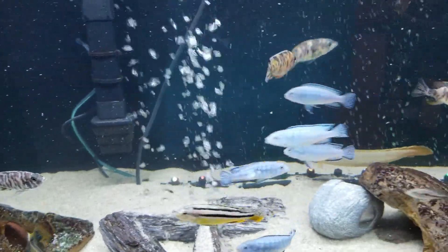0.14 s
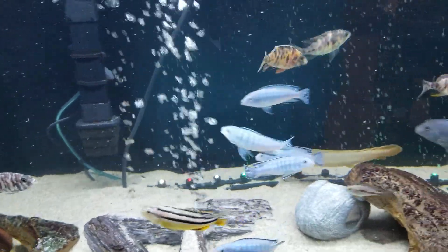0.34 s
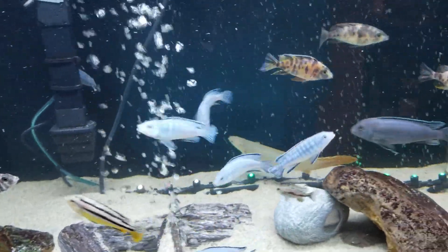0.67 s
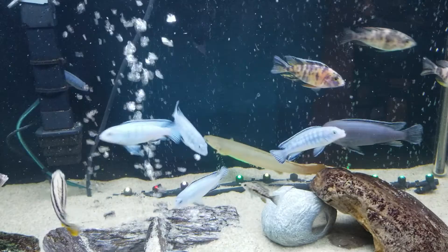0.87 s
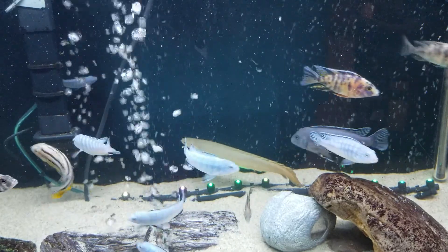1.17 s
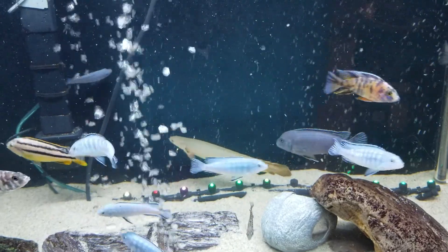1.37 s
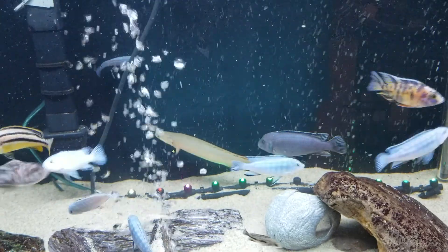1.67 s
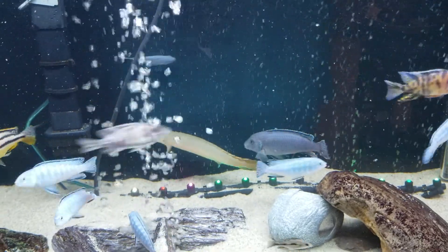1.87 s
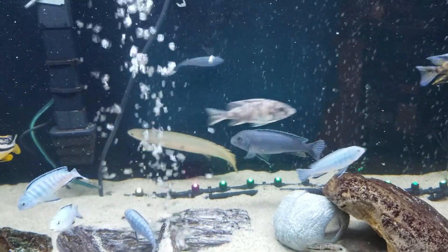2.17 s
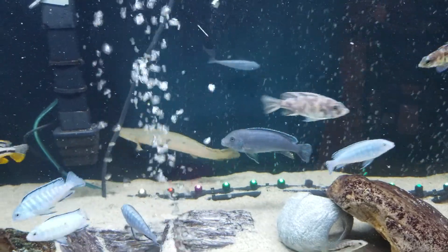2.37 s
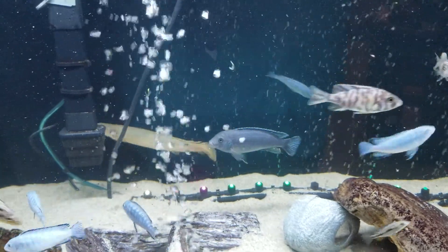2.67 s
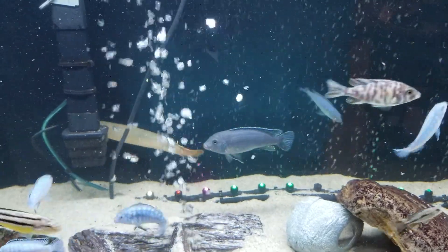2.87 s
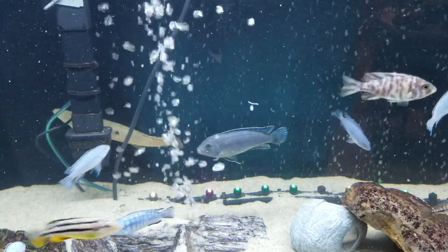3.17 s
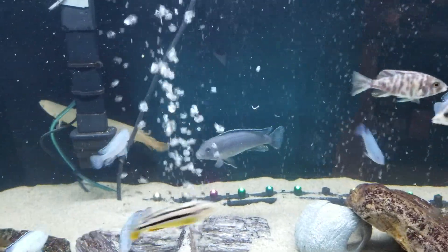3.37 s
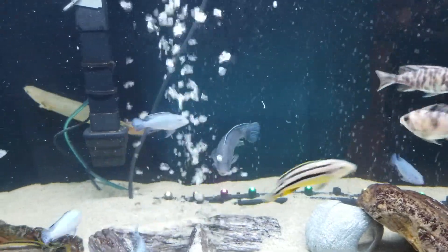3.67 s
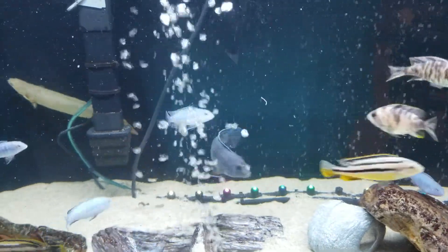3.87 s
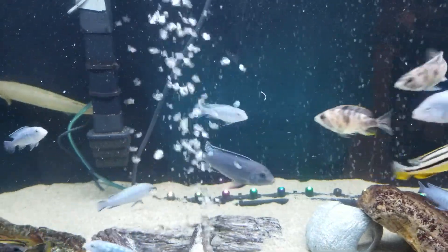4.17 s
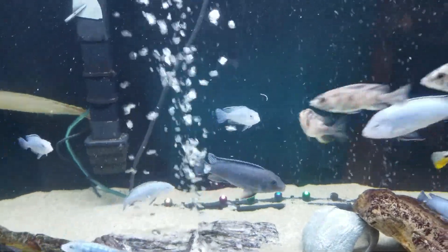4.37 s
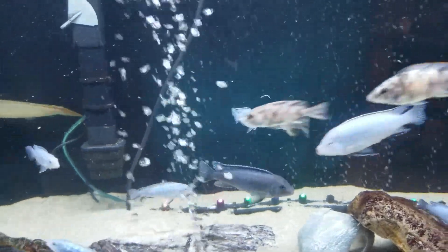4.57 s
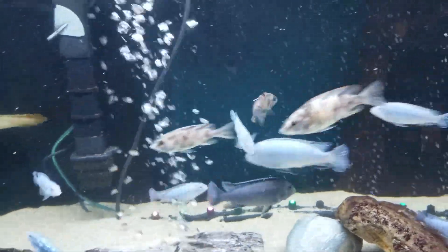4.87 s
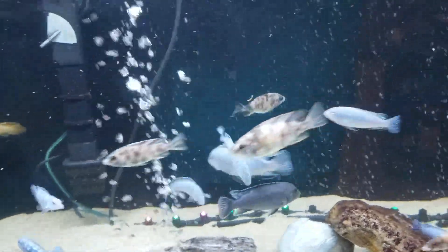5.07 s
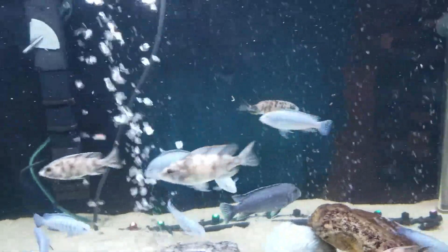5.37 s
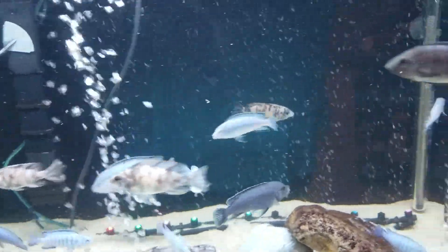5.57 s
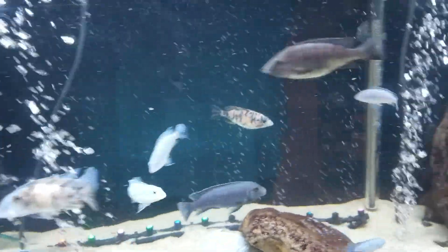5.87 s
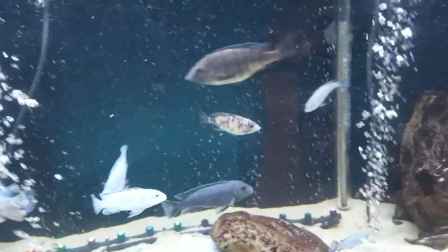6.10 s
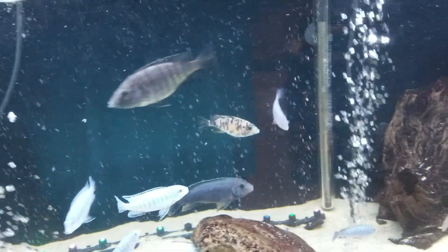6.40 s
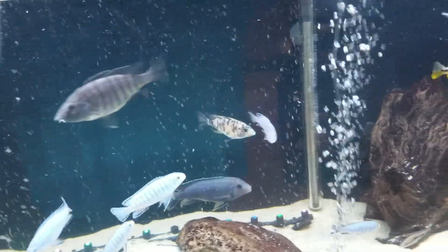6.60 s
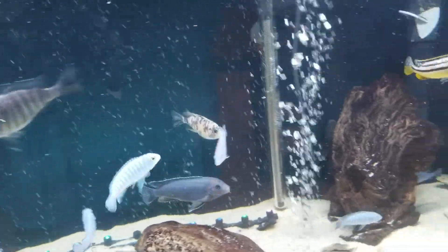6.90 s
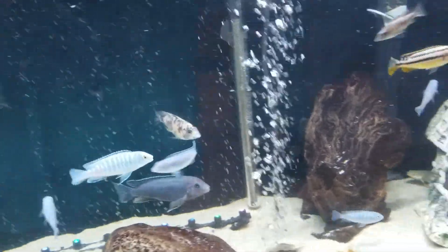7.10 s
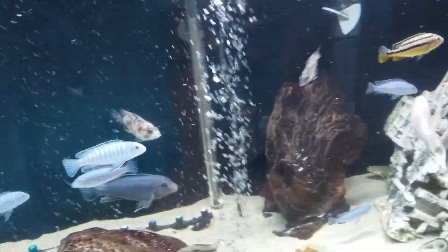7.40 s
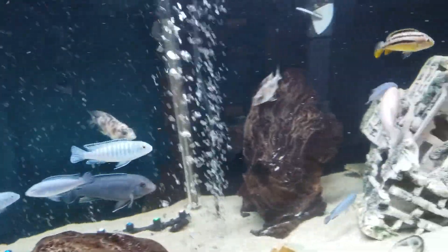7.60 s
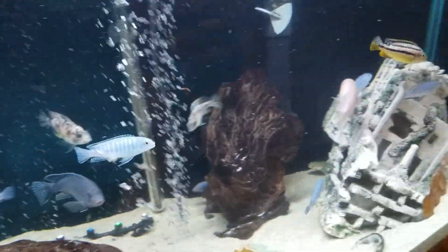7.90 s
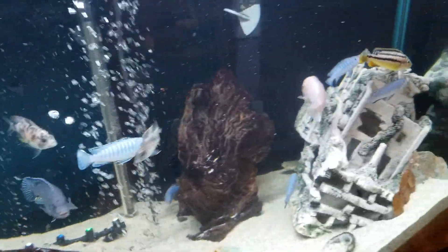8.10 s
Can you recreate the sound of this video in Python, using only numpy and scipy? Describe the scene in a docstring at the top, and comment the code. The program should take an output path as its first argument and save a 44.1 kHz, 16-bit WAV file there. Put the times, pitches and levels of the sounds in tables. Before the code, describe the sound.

Close to an aquarium, a steady low electric hum and muffled filter rumble run throughout under a soft airy hiss. Over them, dense irregular bubbling never stops: throaty burbles, wet plinks, sparkling fizz and sharp little pops. A stronger cluster of bloops comes a little past six seconds. Short splashy echoes suggest the covered tank and a small room.

```python
"""An air pump hums steadily, with water rumbling through the filter of a fish tank and a soft hiss.
Over this, air bubbles break at the surface: big ones burble, small ones fizz, and films snap.
The pump is a stack of steady tones; the rumble is noise shaking resonances; the hiss is coloured noise.
Each bubble is a short fading tone that rises in pitch, with brief echoes above the water and in the room."""
import sys
import numpy as np
from scipy import signal
from scipy.fft import rfft, irfft, next_fast_len
from scipy.io import wavfile
from scipy.ndimage import uniform_filter1d

SR = 44100
rng = np.random.default_rng(int(sys.argv[2]) if len(sys.argv) > 2 else 0)


def transcribe(u):
    """Save the signal u as a 16-bit wav file named by the first command-line argument.

    u: samples, shape (n,) or (channels, n), limited to [-1, 1]; the rate is SR.
    q: integer samples, one column per channel.
    """
    v = np.clip(np.atleast_2d(u).T, -1, 1)
    q = np.round(v * 32767).astype(np.int16)
    wavfile.write(sys.argv[1], SR, q)


N = 363825  # samples, 8.25 s

MAINS_HZ = 60
WALK_START_S, WALK_END_S = 5, 7.4   # the listener moves along the tank to a second spot
CUTOFF_HZ = 15800

# Air pump tones before the port colour; half multiples are a rattle on every second cycle:
# multiple (of the mains rate), first_left_db, first_right_db, second_left_db, second_right_db (at the two spots)
PUMP_TONES = [(1, -42.5, -42, -41.5, -42.5), (2, -54.5, -58, -57.5, -66), (3, -49.7, -51, -49.5, -51.5),
              (4, -50.5, -50.5, -48, -50.5), (5, -50.5, -56, -53.5, -61), (5.5, -60, -64, -61, -74),
              (6, -68.5, -59.5, -57, -53.5), (6.5, -63, -63, -57.5, -60), (7, -60.5, -57.8, -60, -57.5),
              (8, -78, -68.5, -60.5, -62), (8.5, -66, -77, -70, -65), (10, -71.5, -70, -70, -65.5),
              (11, -75, -74, -79, -71)]
# Tank and stand, shaken by the flow: pitch_hz, width_hz, level_db (relative)
TANK_RESONANCES = [(48.6, 52, -1), (82, 4.7, 4), (99.6, 7.2, 0), (133.3, 25.3, 6), (154.4, 4.1, 9.5),
                   (177, 22, -3), (214, 36, -3), (289, 33, -5.5), (385, 156, -7)]
# Even wash of the finest spray and the air of the room: pitch_hz, level_db (relative, per Hz)
WASH_SPECTRUM = [(20, -5), (250, 5.5), (480, 3.5), (640, -1), (900, -2), (1280, -0.5), (1650, 1),
                 (2100, -1.5), (3200, -3), (6500, -7.5), (12000, -12.5), (16000, -9)]
# Loudest big bubbles, before a shared gain: start_s, level_db, pitch_hz (at the start)
BIG_BUBBLES = [(0.03, -36.5, 1070), (0.269, -30, 1050), (0.315, -37, 736), (0.459, -40, 795),
               (0.532, -40, 864), (0.964, -39, 1240), (1.082, -37.5, 1250), (1.367, -40, 1250),
               (1.498, -42, 1210), (1.552, -39.5, 920), (1.659, -40, 1240), (1.844, -39, 800),
               (2.005, -32.5, 1232), (2.039, -38, 1220), (2.338, -35.5, 856), (2.938, -36, 1230),
               (2.998, -36.5, 1200), (3.147, -36, 1250), (3.178, -36, 790), (3.224, -42, 896),
               (3.354, -40, 794), (3.809, -40, 1250), (4.128, -39, 840), (4.719, -29.5, 1055),
               (4.744, -36, 1080), (4.784, -41, 960), (5.142, -42, 820), (5.469, -41, 1210),
               (5.555, -37.5, 980), (5.57, -40, 1250), (5.616, -37, 760), (5.718, -36, 890),
               (5.842, -40, 1220), (5.956, -40, 970), (6.024, -33.5, 1140), (6.09, -34, 1120),
               (6.304, -28, 1320), (6.317, -36, 1300), (6.34, -41, 1030), (6.459, -32, 1120),
               (6.605, -35, 1120), (6.814, -39.5, 1000), (7.499, -36, 970), (7.601, -36, 920)]
# Loudest smaller bubbles, before a shared gain: start_s, level_db, pitch_hz (at the start)
SMALLER_BUBBLES = [(0.0544, -34, 2800), (1.3294, -37, 2010), (1.5733, -32, 3670), (2.5431, -35, 1970),
                   (2.7114, -38, 2310), (2.8714, -30, 3370), (3.3024, -28.5, 2150), (3.5344, -31, 1970),
                   (3.7893, -34.5, 2050), (3.8194, -36, 2030), (4.3859, -31, 3830), (4.5694, -32, 4300),
                   (5.5794, -36, 2470), (5.9898, -33, 2400), (6.86, -35, 1900), (7.0814, -36, 2270),
                   (7.4294, -34, 2330), (7.6191, -34, 2060), (7.6495, -35, 2040)]
# Loudest bursting films, before the gains of rings and clicks:
# start_s, ring_level_db, pitch_hz (at the start), click_db (added to ring_level_db)
BURSTING_FILMS = [(0.1106, -36, 6250, -7), (0.1286, -35, 12000, -1), (0.3474, -41, 12300, 1),
                  (0.98, -35, 6300, -15), (1.1184, -37, 14300, 1), (1.4254, -42, 6540, 11),
                  (1.505, -33.5, 6960, 4), (1.75, -40, 6140, 6), (1.9121, -37, 5370, -7),
                  (2.6424, -30.5, 11200, 1), (2.8828, -34, 9050, -3), (3.0274, -37, 5470, 1),
                  (3.486, -32, 11300, 6), (3.5523, -35, 5450, 4), (3.604, -36.5, 6340, 10),
                  (3.7404, -34, 11300, -7), (4.3181, -39, 11500, 3), (4.53, -39, 6410, 10),
                  (4.57, -32, 14100, 2), (4.6002, -28.5, 6200, -7), (4.8304, -33, 6340, -3),
                  (4.9267, -35, 6890, -7), (5.2544, -42, 7200, 11), (6.544, -35, 6300, -6),
                  (6.711, -32, 7950, 2), (7.0429, -37, 5940, 7), (7.107, -38, 6700, 8),
                  (7.2254, -39, 11500, 3), (7.3267, -45, 6000, 12), (7.9433, -33, 13500, -1)]
# Air space between water and lid, which favours some pitches: pitch_hz, width_hz, lift_db
AIR_SPACE_MODES = [(804, 50, 1), (960, 58, 3.5), (1232, 54, 6.5), (2090, 106, 3)]
# How hard the air column churns the surface (only the swings are used): time_s, level_db
CHURN_CURVE = [(0.0, -49), (1.17, -51.5), (1.61, -49), (2.07, -50.5), (3.21, -49.5), (3.77, -50),
               (4.78, -49.5), (5.74, -50), (6.16, -48.5), (6.69, -51), (7.17, -49.5), (7.54, -51),
               (7.81, -49.5), (8.25, -50)]
# Crowd of big bubbles (only the swings are used): time_s, level_db
BIG_CROWD_CURVE = [(0.0, -53.5), (0.5, -51.5), (0.66, -53.5), (1.79, -52.5), (2.64, -53.5), (3.1, -50.5),
                   (3.75, -52), (3.95, -53), (4.64, -51), (5.49, -52.5), (5.88, -51.5), (6.5, -52.5),
                   (6.64, -55.5), (7.7, -52.5), (7.9, -55.5), (8.25, -53)]
# Crowd of middle bubbles (only the swings are used): time_s, level_db
MIDDLE_CROWD_CURVE = [(0.0, -58), (0.44, -55), (2.11, -55.5), (3.47, -54), (3.79, -54), (4.41, -55.5),
                      (5.24, -56.5), (5.42, -55), (5.63, -56), (6.11, -54.5), (6.71, -57.5), (7.01, -52.5),
                      (7.67, -57), (8.25, -53.5)]
# Likeness of left and right, from -1 (opposite) to 1 (same): pitch_hz, likeness (no unit)
LEFT_RIGHT_LIKENESS = [(100, 0.97), (420, 0.89), (620, 0.3), (1250, 0.23), (1650, -0.44), (2100, 0.2),
                       (2500, -0.084), (16000, -0.014)]
# Treble colour of the two microphone ports: pitch_hz, left_db, right_db
PORT_COLOUR = [(463, 0, 0), (786, 5.5, 0), (1200, 4, 2), (2150, 3.5, 2.5), (3160, 3, 0), (4400, 3, 3),
               (6060, 5, -0.5), (7330, 4.5, -1.5), (8400, -3.5, 4), (9330, -3.5, -2.5), (10720, 2.5, -1.5),
               (12000, 3.5, 1), (13400, 4.5, -1.5), (15500, -3, -6)]


def from_db(db):
    """Turn decibels into a gain."""
    return 10 ** (np.asarray(db) / 20)


def rms_one(x):
    """Scale to an overall rms of 1."""
    return x / np.sqrt(np.mean(x ** 2) + 1e-20)


def in_time(rows):
    """The columns of a curve, at every sample."""
    time_s, *columns = np.transpose(rows)
    return [np.interp(np.arange(N) / SR, time_s, column) for column in columns]


def over_hz(rows, size):
    """The columns of a spectrum, at every bin of a transform."""
    hz, *columns = np.transpose(rows)
    log_bins = np.log(np.fft.rfftfreq(size, 1 / SR) + 1)   # + 1 avoids log(0)
    return [np.interp(log_bins, np.log(hz), column) for column in columns]


def coloured(x, rows):
    """Filter by a dB spectrum with one column, or one for each channel."""
    size = next_fast_len(N + 4096)
    spectrum = rfft(x, size) * from_db(over_hz(rows, size))
    return irfft(spectrum, size)[..., :N]


def diffuse_noise(size):
    """White noise at two close ports: alike in the bass, nearly unrelated in the high treble."""
    padded = next_fast_len(size)
    alike = np.clip(over_hz(LEFT_RIGHT_LIKENESS, padded)[0], -1, 1)
    mid, side = rfft(rng.standard_normal((2, padded)))
    shared = np.sqrt(1 + alike) * mid
    opposed = np.sqrt(1 - alike) * side * [[1], [-1]]
    return rms_one(irfft(shared + opposed, padded)[:, :size])


def drift(rate):
    """Slow random wandering: lines between random knots of spread 1, `rate` knots a second."""
    knots = rng.standard_normal(400)
    return np.interp(np.arange(N) / SR * rate, np.arange(len(knots)), knots)


def swell(db, share):
    """Gain that follows a share of the swings of a level about its mean."""
    return from_db(share * (db - db.mean()))


def pump(stroke_gap=.14, return_stroke=1.09, waver_db=0.3, rattle_db=1.8):
    """A diaphragm knocks twice a mains cycle; walking crosses the standing waves of its overtones."""
    t, out = np.arange(N) / SR, np.zeros((2, N))
    walked = np.interp(t, [WALK_START_S, WALK_END_S], [0, 1])
    for multiple, *levels in PUMP_TONES:
        k = round(2 * multiple) / 2
        first_db, second_db = np.reshape(levels, (2, 2, 1))
        # the two knocks, stroke_gap of a cycle either side of the middle, set the phase of the tone
        forward_knock = np.exp(2j * np.pi * k * stroke_gap)
        return_knock = return_stroke * np.exp(-2j * np.pi * k * stroke_gap)
        phase = np.angle(forward_knock + return_knock)
        depth_db = rattle_db if k % 1 else waver_db * np.log(k)
        unsteady_db = depth_db * drift(3.006)
        tone = np.sqrt(2) * np.cos(2 * np.pi * k * MAINS_HZ * t + phase)   # rms 1
        out += tone * from_db(first_db + walked * (second_db - first_db) + unsteady_db)
    return out


def flow(level_db=-47.5, pan_db=0.5, lowest_hz=30):
    """Circulating water shakes the low resonances of the tank."""
    highpass = signal.butter(2, lowest_hz, "high", fs=SR, output="sos")
    push = signal.sosfilt(highpass, diffuse_noise(N + SR))
    out = 0
    for k, (hz, width, db) in enumerate(TANK_RESONANCES):
        r = np.exp(-np.pi * width / SR)
        top = (1 - r * r) / 2 * from_db(db)
        own_push = np.roll(push, k * SR // 2, axis=1)   # a different stretch of noise for each resonance
        feedback = [1, -2 * r * np.cos(2 * np.pi * hz / SR), r * r]
        out = out + signal.lfilter([top, 0, -top], feedback, own_push)
    settled = out[:, SR:]   # drop the first second, while the resonances build up
    return from_db([[level_db + pan_db], [level_db - pan_db]]) * rms_one(settled)


def wash(churn_db, level_db=-48.5):
    """Countless tiny bursts merge into a hiss that swells a little as the surface churns."""
    hiss = rms_one(coloured(diffuse_noise(N), WASH_SPECTRUM))
    return from_db(level_db) * swell(churn_db, share=0.74) * hiss


def bubbles(rows, cycles, rise, count=6):
    """Each (start, dB, Hz) opens fast, fades 60 dB over `cycles` and rises in pitch, at one of a few spots."""
    out = np.zeros((count, N))
    for k, (start_s, db, hz) in enumerate(rows):
        start = min(max(int(start_s * SR), 0), N - 1)
        length = min(int(cycles / hz * SR) + 2, N - start)
        turns = np.arange(length) * hz / SR
        age = turns / cycles   # 0 at the start, 1 when faded
        opening = 1 - np.exp(-age / .06)
        envelope = 1.6 * opening * from_db(db - 60 * age)
        ring = np.sin(2 * np.pi * turns * (1 + rise * age / 2))
        out[k % count, start:start + length] += envelope * ring
    return out


def swarm(per_s, low_hz, high_hz, spread_db, cycles, rise):
    """Bubbles at random moments and pitches, many weak and few strong; all spots together have rms 1."""
    when, strength, size = rng.random((int(per_s * N / SR), 3)).T
    db = spread_db * np.minimum(-np.log(1 - strength), np.pi)
    hz = low_hz + (high_hz - low_hz) * size
    spots = bubbles(zip(when * N / SR, db, hz), cycles, rise)
    return spots / np.std(spots.sum(axis=0))


def flurries(rows, level_db, scatter_s, octaves, count=3):
    """Weaker companions scattered around each loud bubble in time and pitch: rows of (s, dB, Hz)."""
    scatter = rng.uniform(-1, 1, (len(rows), count, 2))
    return [(start_s + scatter_s * late, db + level_db, hz * 2 ** (octaves * higher))
            for (start_s, db, hz), companions in zip(rows, scatter)
            for late, higher in companions]


def space(spots, direct_db, splash_t60, room_t60, room_db):
    """Each spot is heard directly, by quick echoes between water and glass, and by the room's tail."""
    t = np.arange(SR // 3) / SR
    # each t60 is the time in seconds to fade by 60 dB
    early = rms_one(np.exp(-np.log(1000) * t / splash_t60))
    late = rms_one(np.exp(-np.log(1000) * t / room_t60))
    echoes = np.hypot(early, from_db(room_db) * late)
    direct = from_db(direct_db) * rms_one(1. * (t == 0))
    size, out = next_fast_len(N + len(t)), 0
    for x in spots:
        paths = rfft(direct + echoes * diffuse_noise(len(t)), 2 * len(t))
        # a diffuse field favours no broad range of pitch
        paths = paths / np.sqrt(uniform_filter1d(np.abs(paths) ** 2, size=60))
        response = irfft(paths)[:, :len(t)]
        out = out + rfft(x, size) * rfft(response, size)
    return irfft(out, size)[:, :N]


def hood(x):
    """The modes of the air space lift the bubbles that fall on them."""
    hz = np.geomspace(500, 3000, 300)
    lift_db = sum(db / (1 + (2 * (hz - centre) / width) ** 2) for centre, width, db in AIR_SPACE_MODES)
    return coloured(x, np.column_stack([hz, lift_db]))


def burble(burble_db, trickle_db):
    """Big and middle bubbles open at the surface, with single louder ones among them."""
    big = swarm(per_s=130, low_hz=720, high_hz=1520, spread_db=1.8, cycles=33, rise=.05)
    middle = swarm(per_s=190, low_hz=1750, high_hz=2800, spread_db=2.0, cycles=44, rise=.05)
    big_crowd = from_db(-56.5) * swell(burble_db, share=1.2) * big
    middle_crowd = from_db(-60.0) * swell(trickle_db, share=1.7) * middle
    gulp_rows = BIG_BUBBLES + flurries(BIG_BUBBLES, level_db=-13, scatter_s=.04, octaves=0.11)
    gulps = from_db(-1.4) * bubbles(gulp_rows, cycles=31.5, rise=.02)
    plink_rows = SMALLER_BUBBLES + flurries(SMALLER_BUBBLES, level_db=-8, scatter_s=.03, octaves=0.14)
    plinks = from_db(-1.3) * bubbles(plink_rows, cycles=22, rise=0.057)
    spots = big_crowd + middle_crowd + gulps + plinks
    return hood(space(spots, direct_db=-3.0, splash_t60=0.12, room_t60=0.21, room_db=0.5))


def spray(churn_db):
    """Small bubbles tinkle, their films crackle, and the strongest snap with a click and a short ring."""
    small = swarm(per_s=420, low_hz=2700, high_hz=7800, spread_db=3.6, cycles=46, rise=.06)
    crackle = swarm(per_s=240, low_hz=6000, high_hz=15500, spread_db=4.3, cycles=9, rise=.05)
    fizz = swell(churn_db, share=1.3) * (from_db(-55.5) * small + from_db(-54.5) * crackle)
    films = [(start_s, db, hz) for start_s, db, hz, click_db in BURSTING_FILMS]
    ring_rows = films + flurries(films, level_db=-11, scatter_s=0.022, octaves=0.23)
    rings = from_db(7.0) * bubbles(ring_rows, cycles=20.7, rise=.03)
    click_rows = [(start_s, db + click_db, 12000) for start_s, db, hz, click_db in BURSTING_FILMS]
    clicks = from_db(12.0) * bubbles(click_rows, cycles=4.3, rise=0)
    return space(fizz + rings + clicks, direct_db=-13, splash_t60=0.069, room_t60=0.19, room_db=0.0)


def scene():
    """Pump, flow and hiss below, the breaking bubbles above."""
    churn_db, = in_time(CHURN_CURVE)
    burble_db, = in_time(BIG_CROWD_CURVE)
    trickle_db, = in_time(MIDDLE_CROWD_CURVE)
    background = pump() + flow() + wash(churn_db)
    return background + burble(burble_db, trickle_db) + spray(churn_db)


def record(dry):
    """Each port colours the treble in its own way; the top is cut."""
    lowpass = signal.ellip(12, .1, 80, CUTOFF_HZ, fs=SR, output="sos")   # 0.1 dB ripple, 80 dB cut
    return signal.sosfilt(lowpass, coloured(dry, PORT_COLOUR))


dry = scene()
out = record(dry)
transcribe(out)
```